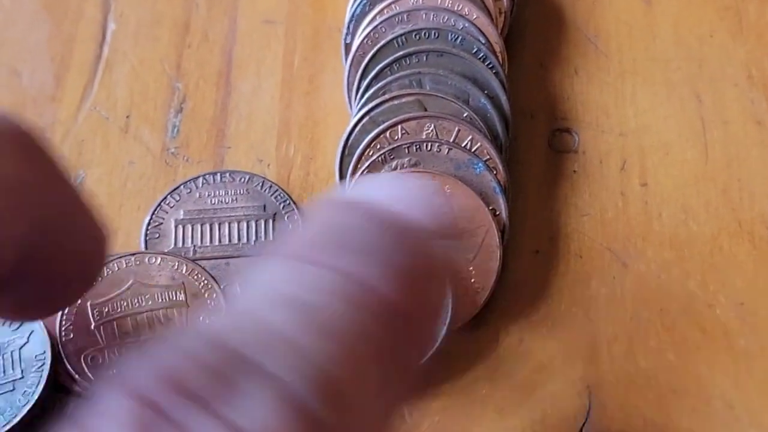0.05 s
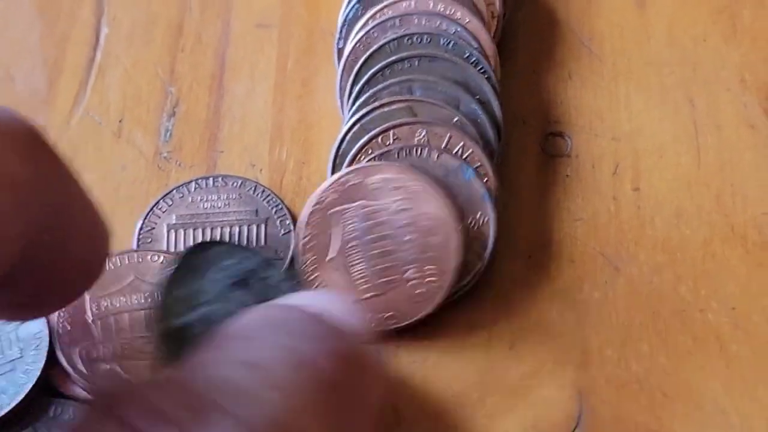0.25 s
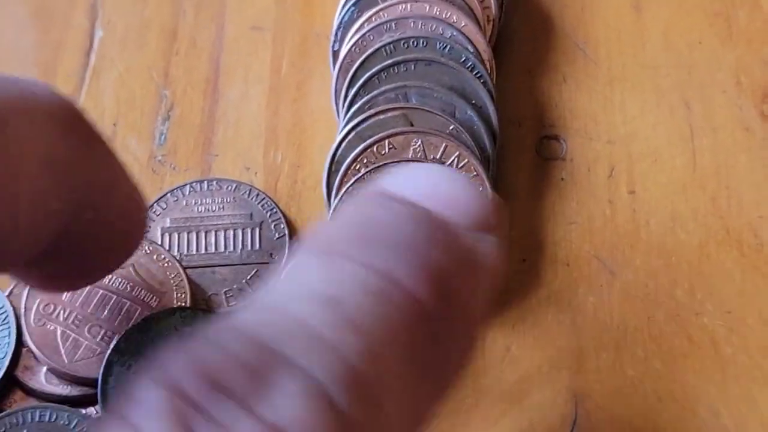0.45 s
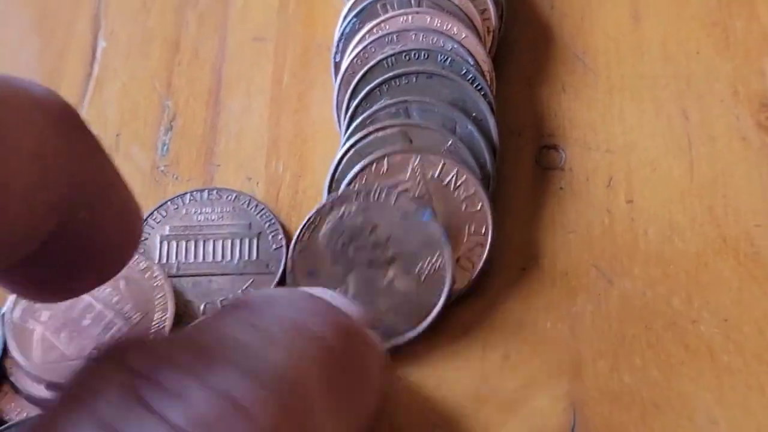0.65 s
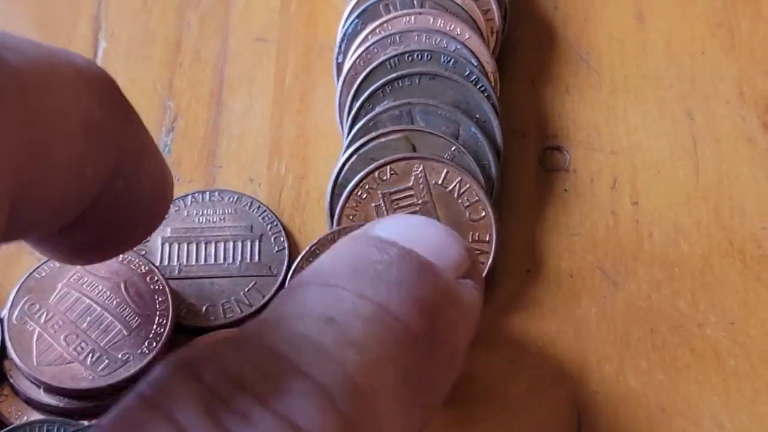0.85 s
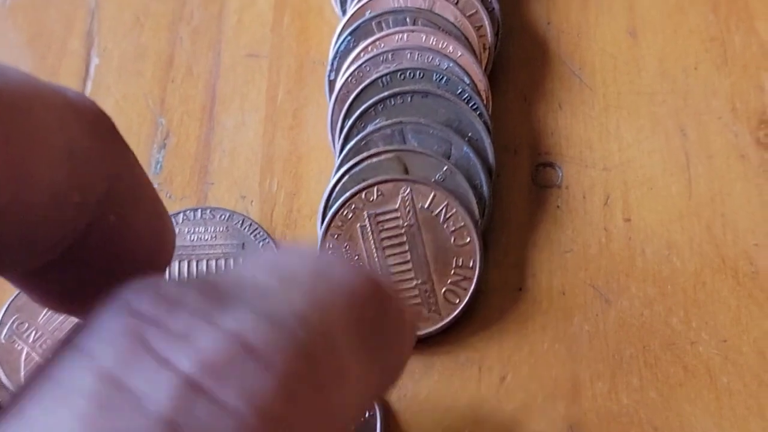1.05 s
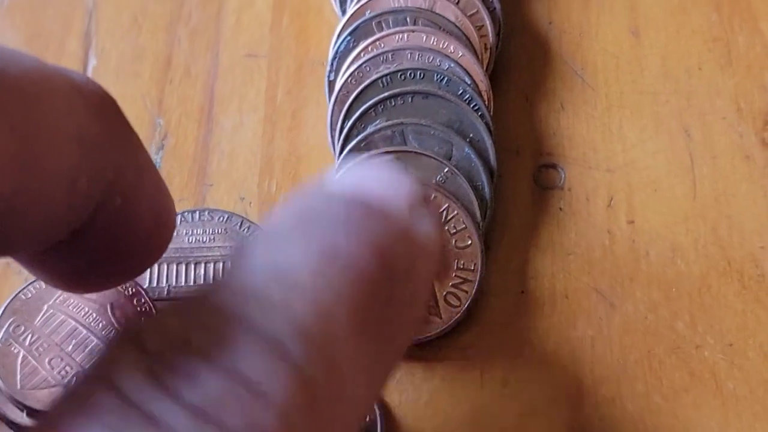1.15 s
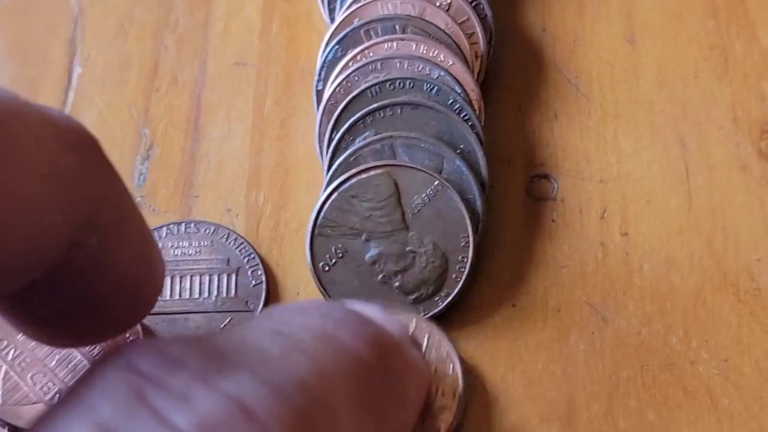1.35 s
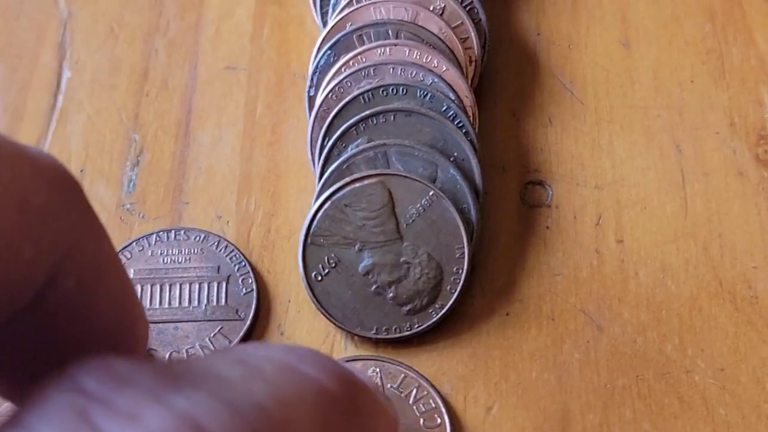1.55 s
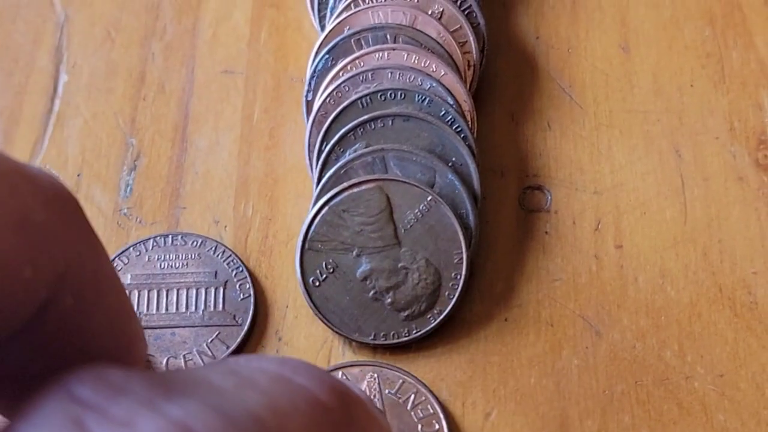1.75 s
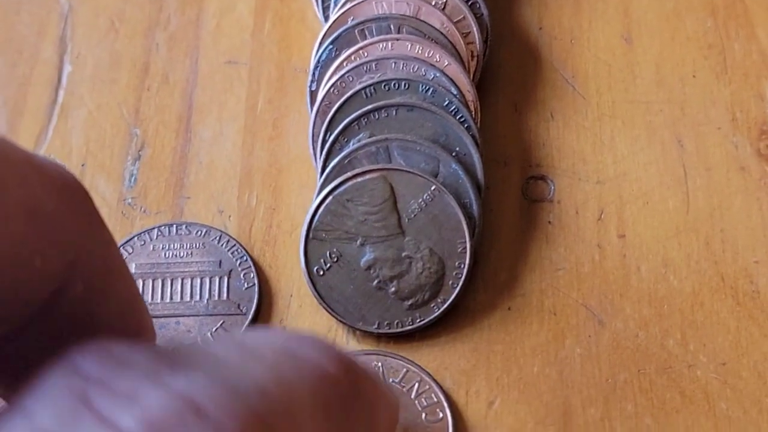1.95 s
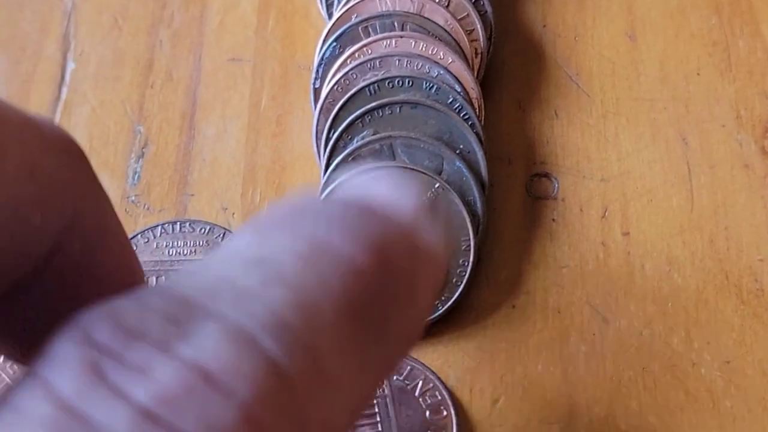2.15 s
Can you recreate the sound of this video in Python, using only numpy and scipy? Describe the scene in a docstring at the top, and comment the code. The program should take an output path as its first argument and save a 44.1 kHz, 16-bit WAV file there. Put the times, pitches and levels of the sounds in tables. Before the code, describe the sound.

Coins slide off one another and drag over a wooden tabletop in four quick bursts of clinks, gritty scrapes and light knocks. A few soft ticks follow. The microphone is close, in a quiet room.

```python
"""Coins clack and scrape as a finger slides them off an overlapping row and across a wooden table,
close by in a quiet room. Each coin drops off its neighbour, then drags along in a stream of tiny
impacts. Every contact excites resonances: a knock in the wood, a clack, a sizzle in the metal.
A coin that comes free rings briefly. Faint room air and mains hum lie underneath."""
import sys
import numpy as np
from scipy import signal
from scipy.fft import rfft, irfft
from scipy.io import wavfile
from scipy.ndimage import uniform_filter1d

SR = 44100
rng = np.random.default_rng(int(sys.argv[2]) if len(sys.argv) > 2 else 0)


def store_wav(level_fs):
    """Save 16-bit WAV to argv[1]."""
    pcm = np.round(np.clip(np.atleast_2d(level_fs), -1, 1) * 32767)
    wavfile.write(sys.argv[1], SR, pcm.T.astype(np.int16))


N = 97020

WOOD, CLACK, SIZZLE = range(3)  # the parts of a contact's sound, in column order


def undb(db):
    """Decibels to amplitude ratio."""
    return 10 ** (np.asarray(db) / 20)


def unit(x):
    """Normalisation to unit energy."""
    return x / np.sqrt(np.sum(x ** 2, axis=-1, keepdims=True))


def fade(t, t60):
    """Exponential damping: 60 dB in t60 seconds."""
    return np.exp(-np.log(1000) * t / t60)


def pan(db):
    """Constant-power panning, left exceeding right by db."""
    return np.sqrt(2) * unit(undb(np.array([db, -db]) / 2))[:, None]


def colour(points, size=4096):
    """Minimum-phase impulse response of a given spectrum."""
    hz, db = np.array(sorted(points)).T
    f = np.maximum(np.arange(size // 2 + 1) * SR / size, 1)
    cepstrum = irfft(np.log(undb(np.interp(np.log(f), np.log(hz), db))))
    cepstrum[1:size // 2] *= 2
    cepstrum[size // 2 + 1:] = 0
    return unit(irfft(np.exp(rfft(cepstrum))))


def convolve(x, response):
    """Linear filtering of one or two channels."""
    return signal.fftconvolve(np.atleast_2d(x), np.atleast_2d(response), axes=1)[:, :N]


def coins(grains):
    """Forced vibration: knocks and scrapes drive the wood, the clack and the finger-damped metal."""
    # spectra of the contact crack (frequency [Hz], relative level [dB])
    wood_crack = [(150, -34), (420, -10.5), (560, -21), (700, -5), (840, -9), (1050, 2), (1420, 1),
                  (2100, -4), (3000, -11.5), (8000, -56.5)]
    clack_crack = [(600, -25), (1700, -8), (2500, 0.5), (4000, 1), (7000, -1.5), (8400, -9.5), (9300, -6.5),
                   (10200, -15), (11500, -42.5), (16000, -79.5)]
    sizzle_crack = [(2000, -24), (8000, -29), (11200, -3), (12000, -12.5), (12700, -6), (14000, -3.5),
                    (15700, -2), (17000, -12.5)]
    # resonances (frequency [Hz], relative level [dB], t60 [s])
    wood_modes = [(683, 3, 0.053), (1061, -7, 0.075), (1398, 1.5, 0.012), (1436, -9.5, 0.071),
                  (1880, 3, .03)]
    clack_modes = [(2792, 1, 0.053), (2990, 9, 0.017), (3520, -1, 0.0067), (4040, -5, .04),
                   (4970, -2, 0.0252), (6300, -10, .03), (6950, -24, 0.047)]
    sizzle_modes = [(12570, -10, 0.036), (12870, 12.5, 0.004), (13400, -7, .015), (13760, -3, 0.014),
                    (14850, -31, .008), (16720, 12, 0.0033)]
    scrape_db = [0.5, -2, -3.5]  # wood, clack, sizzle
    scrape = [undb(db) * grains * slide_envelope(1 + part) for part, db in enumerate(scrape_db)]
    wood = resonate(knocks(WOOD) + scrape[WOOD].mean(axis=0), wood_crack, wood_modes, modes_db=-6)
    wood = reflect(wood, near_db=-5, room_db=-12.5, room_t60=0.3, width=0.99)
    clack = resonate(knocks(CLACK) + pan(-7) * scrape[CLACK], clack_crack, clack_modes, modes_db=-8)
    clack = reflect(clack, near_db=-4, room_db=-8, room_t60=0.26, width=2.8)
    sizzle = resonate(knocks(SIZZLE) + scrape[SIZZLE], sizzle_crack, sizzle_modes, modes_db=2)
    sizzle = reflect(sizzle, near_db=-5, room_db=-12.5, room_t60=0.16, width=1)
    return pan(-0.5) * wood + clack + pan(5.5) * sizzle


def knocks(part):
    """Impact with rebound: a blow, then weaker bounces. A brief swell of noise softens the attack."""
    # coins dropping and meeting, in relative levels
    # (time [s], wood [dB], clack [dB], sizzle [dB], clack left over right [dB])
    impacts = [(0.1254, -52, -47, -73.5, -5), (0.137, -42, -49, -60, -51), (0.1896, -35.5, -31, -32.5, -26),
               (0.1956, -51, -34.5, -28.5, 3), (0.2182, -45, -38, -29, -2), (0.249, -32, -23, -23.5, -3),
               (0.265, -39, -32, -43, -9), (0.2795, -34, -22.5, -24, -3), (0.2905, -35, -24, -30, -2),
               (0.3017, -36, -29, -27, -10), (0.3114, -31, -26, -24, -7), (0.3147, -39, -29, -26, -6),
               (0.3217, -34, -30, -21.5, -1), (0.3391, -32, -24, -40, -6), (0.3471, -34, -29, -24, -12),
               (0.3618, -36, -26.5, -37, -6), (0.3713, -35, -27, -31, -6), (0.3869, -34, -26, -29, -6),
               (0.41, -34, -23.5, -44, -35), (0.425, -45, -25.5, -35, -1), (0.4302, -29.5, -26.5, -37, -16),
               (0.4399, -36, -30.5, -39, -22), (0.5722, -43, -27, -31, -7),
               (0.5802, -44, -28.5, -35, -13.5), (0.5943, -52, -28, -39, 0), (0.6045, -48, -29.5, -45, -6),
               (0.6155, -40, -27.5, -31, -7), (0.64, -29, -11, -36, -0.5), (0.645, -35, -39, -9.5, 25.5),
               (0.6466, -42, -15.5, -43, 0.5), (0.6542, -24.5, -17.5, -23, -5.5),
               (0.6661, -23.5, -18.5, -20, -5), (0.6713, -30.5, -25, -21, -7),
               (0.6773, -44, -22.5, -21, -1), (0.7272, -49, -19.5, -50, -24),
               (0.7442, -30, -19.5, -33, -4.5), (0.7561, -36, -26, -41, -12), (0.8691, -38, -31, -35, -23),
               (0.8734, -38, -24, -21.5, -6), (0.8755, -75, -39, -22, 7), (0.8781, -32.5, -35, -28, 8),
               (0.9397, -55, -39, -40, -5), (0.9473, -40, -30.5, -32, -11), (0.9566, -33, -24.5, -25.5, -2),
               (0.9648, -47, -22, -25, -24), (0.9763, -36, -28.5, -34, 7), (1.0058, -24.5, -18, -23, -12),
               (1.015, -50, -26.5, -22, 12), (1.0154, -55, -40, -28, -4), (1.063, -42, -51, -44.5, -6),
               (1.21, -33.5, -38, -20, -5), (1.2115, -27, -25, -20, -23.5), (1.2158, -36, -33, -30.5, -6),
               (1.2243, -39, -28, -32, -1.5), (1.2736, -54, -48.5, -43, -9),
               (1.279, -56.5, -44, -45.5, -14), (1.2883, -57, -42, -37, -14), (1.3, -43, -27.5, -33, -9),
               (1.3492, -52, -24, -32.5, -8.5), (1.3782, -42, -28, -36, -4.5),
               (1.4055, -44, -32, -35.5, -10), (1.4325, -57, -27.5, -36, -31.5),
               (1.437, -19.5, -14, -22, -12.5), (1.4407, -51, -17.5, -20, 1.5),
               (1.4435, -23.5, -17, -38, -2), (1.6768, -51.5, -52, -66, -5.5),
               (1.7027, -47, -45.5, -56.5, -5), (1.7113, -52, -57, -73, -6), (1.7587, -57.5, -58, -70, -9),
               (1.981, -38, -35.5, -44, -15), (2.0705, -59, -59, -78, -9), (2.1623, -51.5, -52, -62, -16)]
    blow_db = [22, 23.5, 25.5][part]
    swell_db, swell_rise_s = [-7.5, -11.5, -9][part], 0.0025
    bounces, mean_gap_s, bounce_db = 5, 0.0008, -11.5
    force = np.zeros((2, N))
    chance = rng.random((len(impacts), 2, bounces))
    noises = rng.standard_normal((len(impacts), SR // 100))
    swell = np.exp(-np.arange(SR // 100)[::-1] / SR / swell_rise_s)
    for (start, *levels, side_db), (gaps, sizes), noise in zip(impacts, chance, noises):
        delays = np.r_[0, np.cumsum(2 * mean_gap_s * gaps)]
        at = ((start + delays) * SR).astype(int)
        chatter = undb(bounce_db) * 2 * (2 * sizes - 1) * np.linspace(1, 0.5, bounces)
        strength = pan(side_db if part == CLACK else 0) * undb(levels[part] + blow_db)
        force[:, np.minimum(at, N - 1)] += strength * unit(np.r_[1, chatter])
        force[:, at[0] - len(noise):at[0]] += strength * undb(swell_db) * unit(noise * swell)
    return force


def friction():
    """Stick-slip friction: rims and embossed faces catch in bunches of tiny, uneven impacts."""
    grains_per_s, spread_db, side_scatter = 1700, 4.5, 0.94
    catches_per_s, catch_db = 260, 3.5
    hits = rng.random(N) < grains_per_s / SR
    sizes = undb(spread_db * np.clip(rng.standard_normal(N), -2, 2))
    grains = hits * sizes * (rng.choice([-1, 1], N) + side_scatter * rng.standard_normal((2, N)))
    catch = (np.arange(N) * catches_per_s / SR).astype(int)
    grains *= undb(catch_db * rng.standard_normal(N)[catch])
    local_power = uniform_filter1d(np.mean(grains ** 2, axis=0), size=600)
    return grains / np.sqrt(local_power + 1e-9)


def slide_envelope(column):
    """Amplitude modulation: friction sounds only while a coin moves. Column 0 is the rumble."""
    # four slides, each a curve of relative levels
    # (time [s], rumble [dB], wood [dB], clack [dB], sizzle [dB])
    slides = [
        [(0.21, -51, -60, -50, -52), (0.218, -44, -39, -33.5, -31), (0.24, -50, -43.5, -43, -63),
         (0.246, -50.5, -34.5, -29.5, -31), (0.328, -34.5, -34.5, -30, -26), (0.344, -36, -34.5, -29, -31),
         (0.406, -39.5, -40, -46, -36), (0.432, -63, -36.5, -27.5, -35), (0.47, -57, -46.5, -44, -65)],
        [(0.565, -63, -49, -37, -40), (0.571, -44.5, -42.5, -46, -30), (0.627, -49, -32, -28.5, -43),
         (0.641, -39, -33.5, -20, -14), (0.659, -36.5, -37, -33, -28), (0.675, -34, -31, -19, -29),
         (0.693, -39.5, -37.5, -25.5, -18), (0.715, -60, -49, -41, -49), (0.725, -64, -31.5, -17, -45)],
        [(0.93, -56, -41.5, -41, -34), (0.938, -61, -47, -38.5, -46), (0.964, -44, -37, -31, -40),
         (0.99, -44, -35.5, -32.5, -53), (0.998, -60, -38, -33, -32), (1.006, -58, -31.5, -25, -33),
         (1.016, -35, -33.5, -26.5, -30), (1.028, -50, -37.5, -44, -43), (1.05, -56, -43.5, -51, -41)],
        [(1.265, -44, -38, -54, -52), (1.273, -64, -59, -40.5, -45), (1.297, -51, -44.5, -30.5, -36),
         (1.333, -51, -32.5, -30, -27), (1.341, -65, -42, -28.5, -32), (1.351, -57, -31.5, -23, -21),
         (1.357, -59, -39.5, -32.5, -35), (1.413, -55, -41.5, -42.5, -47), (1.425, -45, -47, -36, -71)],
    ]
    ceiling_db, edge_s = -23, 0.0035
    t = np.arange(N) / SR
    out = np.zeros(N)
    for slide in slides:
        times, *levels = np.array(slide).T
        db = np.minimum(np.interp(t, times, levels[column]), ceiling_db)
        outside_s = t - np.clip(t, times[0], times[-1])
        out += undb(db) * np.exp(-(outside_s / edge_s) ** 2)
    return out


def resonate(force, crack, modes, modes_db):
    """Modal response: a contact force excites a broadband crack and damped normal modes."""
    body = colour(crack)
    t = np.arange(len(body)) / SR
    ring = sum(undb(db) * unit(np.cos(2 * np.pi * hz * t) * fade(t, t60)) for hz, db, t60 in modes)
    ring = np.convolve(ring, body[:256])[:len(body)]
    return convolve(force, unit(body + undb(modes_db) * unit(ring)))


def free_rings():
    """Beating: a freed coin rings on its lowest mode, split in two by the embossed face."""
    # free vibrations (time [s], frequency [Hz], level [dB], t60 [s])
    rings = [(.311, 13050, -22, .11), (0.389, 12550, -31.5, 0.16), (0.409, 12720, -35, 0.12),
             (.427, 12600, -27.5, 0.085), (.672, 12700, -14, 0.11), (0.684, 13100, -15, 0.064),
             (0.728, 13000, -34, 0.1), (0.7467, 12630, -28.5, 0.057), (1.041, 13130, -29, .08),
             (1.4373, 13030, -46, 0.061)]
    split_hz, twin_db = 39, -4
    out = np.zeros(N)
    for start, hz, db, t60 in rings:
        t = np.maximum(np.arange(N) / SR - start, 0)
        twin = undb(twin_db) * np.sin(2 * np.pi * (hz + split_hz) * t)
        out += undb(db) * fade(t, t60) * (np.sin(2 * np.pi * hz * t) + twin)
    return pan(6.5) * out


def hollow_notes():
    """Band-pass resonance: decaying noise gives short hollow notes on some taps and scrapes."""
    # hollow notes (time [s], frequency [Hz], level [dB])
    notes = [(0.19, 1423, -34.5), (0.1898, 2800, -33), (0.7268, 2990, -25.5), (0.7427, 2990, -24),
             (0.873, 1844, -34.5), (.874, 670, -45), (1.0071, 1480, -33), (1.2158, 712, -29.5),
             (1.2138, 2860, -28.5), (1.299, 2820, -34), (1.327, 2840, -27), (1.3502, 2780, -30),
             (1.4394, 2960, -18.5), (1.983, 1417, -44.5), (1.983, 920, -43)]
    t60, bandwidth_hz = 0.071, 310
    out = np.zeros(N)
    t = np.arange(SR // 8) / SR
    decay = fade(t, t60)
    for (start, hz, db), noise in zip(notes, rng.standard_normal((len(notes), len(t)))):
        peak = signal.iirpeak(hz, hz / bandwidth_hz, fs=SR)
        note = unit(signal.lfilter(*peak, signal.lfilter(*peak, noise * decay)))
        at = int(start * SR)
        out[at:at + len(t)] += undb(db) * note * np.sqrt(np.sum(decay ** 2) / 2)
    return out


def table_top(grains):
    """Plate vibration: the table rumbles under dragged coins and thumps under heavy ones."""
    # soft blows (time [s], force level [dB])
    thumps = [(0.639, -19), (1.008, -17.5), (1.437, -14.5), (1.746, -22.5)]
    # spectrum of a contact (frequency [Hz], relative level [dB])
    crack = [(60, -17.5), (130, -11.5), (270, -4), (410, 5.5), (480, -9), (560, -2), (900, -30.5),
             (2000, -69)]
    # plate modes (frequency [Hz], relative level [dB], t60 [s])
    modes = [(292, -13.5, 0.044), (327, -7.5, .06), (411, -0.5, .09), (436, -3.5, 0.095)]
    force = undb(-2) * grains.mean(axis=0) * slide_envelope(column=0)
    for start, db in thumps:
        force[int(start * SR)] += undb(db)
    direct = resonate(force, crack, modes, modes_db=14)
    return reflect(direct, near_db=-27, room_db=-3.5, room_t60=0.25, width=0.49)


def reflect(direct, near_db, room_db, room_t60, width):
    """Early reflections off hand and table, and room reverberation, shift as hand and coins move."""
    spots, spot_s = 5, 0.045  # positions cross-faded in a cycle, time at each
    near_t60, near_delay_s, room_build_s = 0.031, 0.0013, 0.0027
    t = np.arange(SR // 3) / SR
    build_up = 1 - np.exp(-t / room_build_s)
    travel = np.arange(N) / SR / spot_s
    out = direct
    for spot in range(spots):
        noise = rng.standard_normal((3, len(t)))
        noise = noise[2] + width * noise[:2]  # width decorrelates left and right
        near = undb(near_db) * unit(noise * fade(t, near_t60) * (t > near_delay_s))
        room = undb(room_db) * unit(noise[:, ::-1] * fade(t, room_t60) * build_up)
        presence = np.sqrt(np.maximum(1 - np.abs((travel - spot) % spots - 1), 0))
        out = out + convolve(direct * presence, near + room)
    return out / np.sqrt(1 + undb(near_db) ** 2 + undb(room_db) ** 2)


def background():
    """Noise floor: the continuous spectrum of room air and the line spectrum of a swelling mains hum."""
    # room air (frequency [Hz], relative spectral density [dB])
    air_spectrum = [(22, -25.5), (34, -18.5), (46, 6.5), (80, -4), (160, -9.5), (280, -5.5), (450, -12),
                    (700, -18), (1400, -24.5), (2200, -28), (3000, -24.5), (5000, -32.5), (8300, -27.5),
                    (9600, -41), (16000, -47)]
    # hum partials (frequency [Hz], relative level [dB])
    hum_lines = [(47.8, -52.5), (59.2, -47.5), (118.4, -66.5), (241.5, -63.5), (291, -71.5)]
    air_db, side_db = -55.5, -4.5
    hum_start_db, rise_db_per_s = -4.5, 2.5
    t = np.arange(N) / SR
    mid, side = convolve(rng.standard_normal((2, N)), colour(air_spectrum))
    air = undb(air_db) * (mid + undb(side_db) * np.array([side, -side]))
    hum = sum(np.sqrt(2) * undb(db) * np.sin(2 * np.pi * (hz * t + rng.random())) for hz, db in hum_lines)
    return air + hum * undb(hum_start_db + rise_db_per_s * t)


def scene():
    """Arrival time: the coins reach the left microphone first, the wide table top both at once."""
    right_lag_s = 0.00013
    grains = friction()
    left, right = coins(grains) + free_rings()
    coin_sound = np.array([left, np.roll(right, round(right_lag_s * SR))])
    return coin_sound + table_top(grains) + hollow_notes() + background()


def record(dry):
    """Soft saturation rounds the sharpest peaks; a steep low-pass cuts the highest treble."""
    ceiling, cutoff_hz = 0.78, 15780
    rounded = ceiling * np.tanh(dry / ceiling)
    return signal.sosfilt(signal.ellip(10, 0.2, 70, cutoff_hz, fs=SR, output="sos"), rounded)


dry = scene()
out = record(dry)
store_wav(out)
```